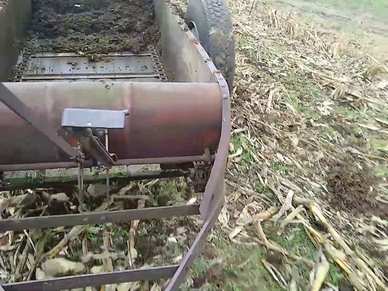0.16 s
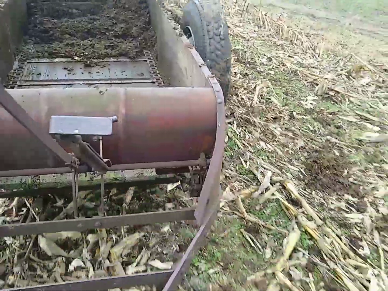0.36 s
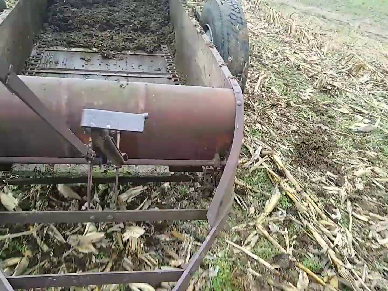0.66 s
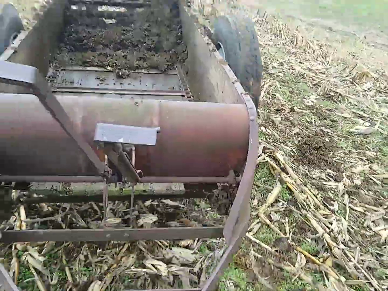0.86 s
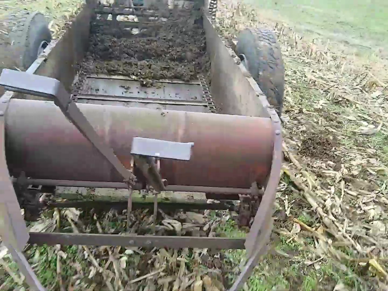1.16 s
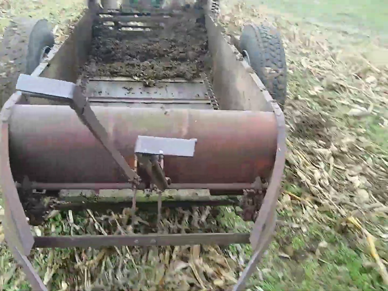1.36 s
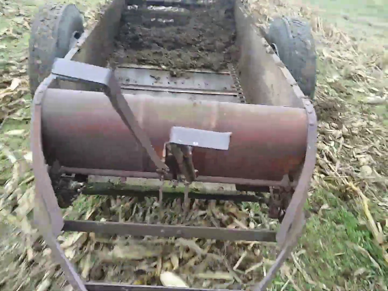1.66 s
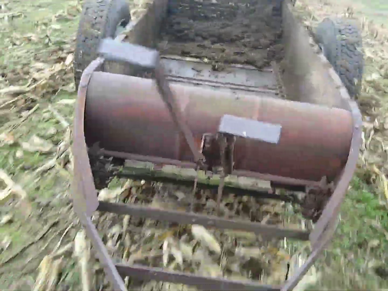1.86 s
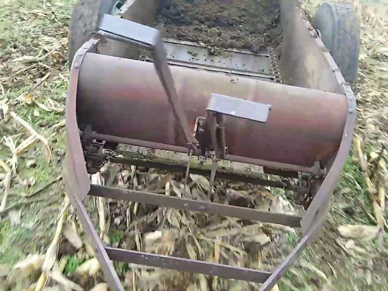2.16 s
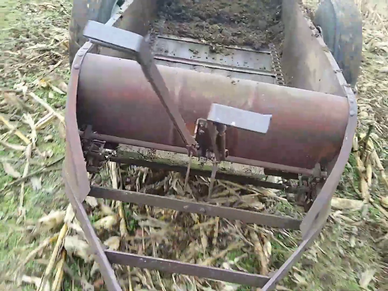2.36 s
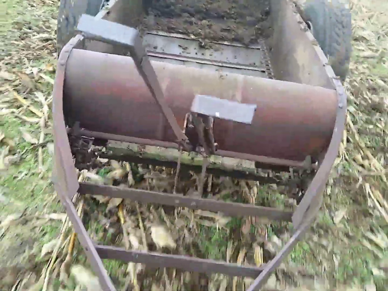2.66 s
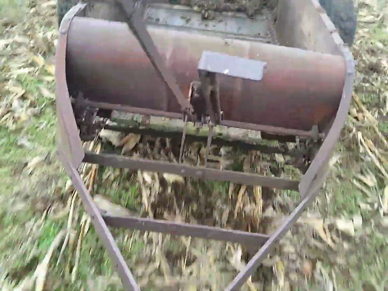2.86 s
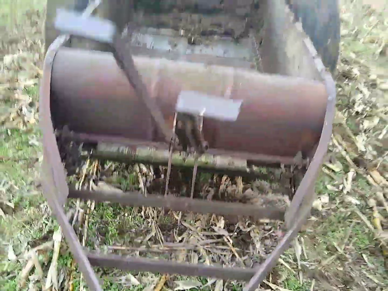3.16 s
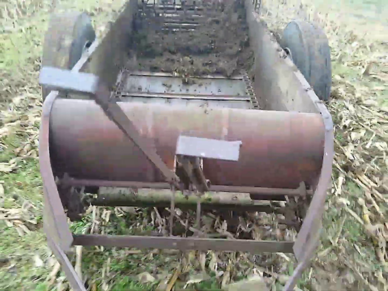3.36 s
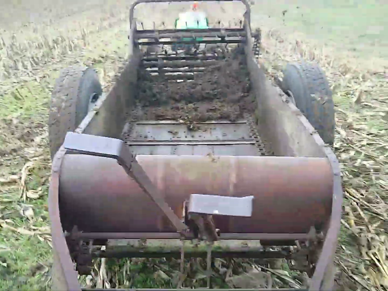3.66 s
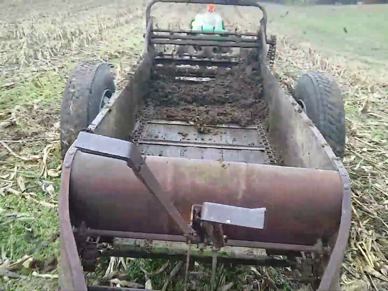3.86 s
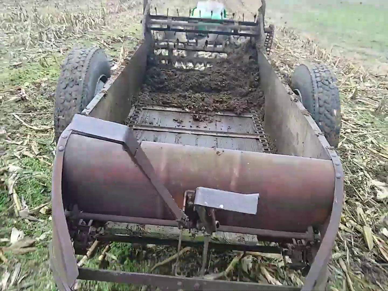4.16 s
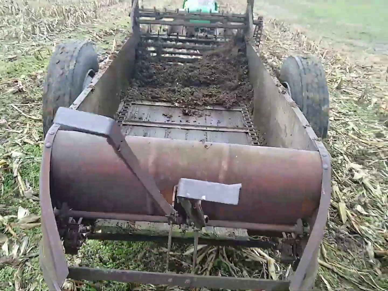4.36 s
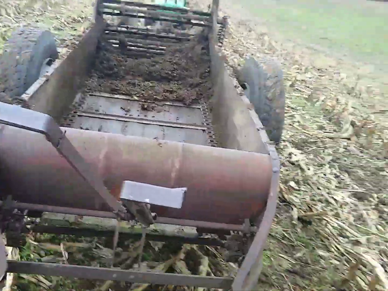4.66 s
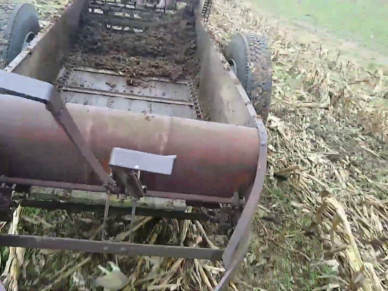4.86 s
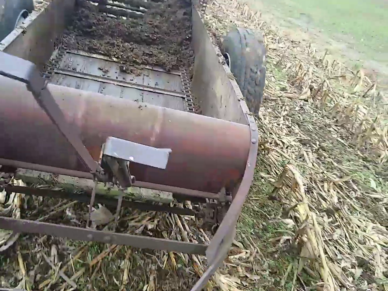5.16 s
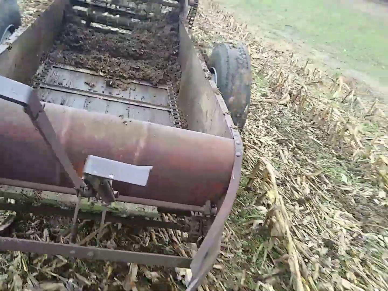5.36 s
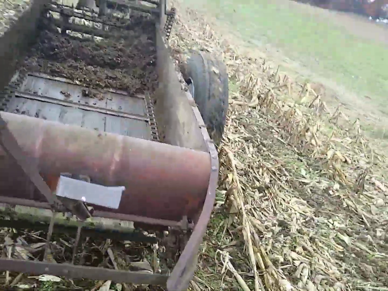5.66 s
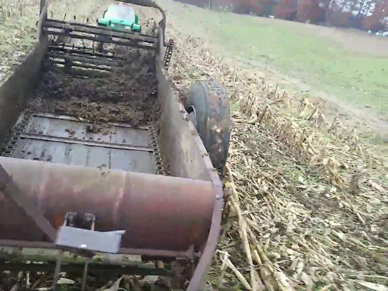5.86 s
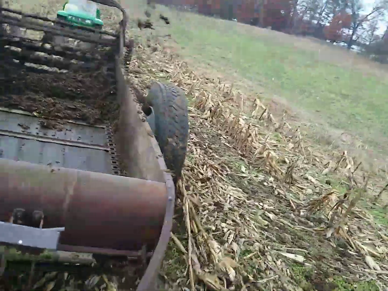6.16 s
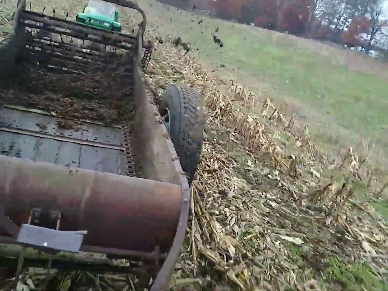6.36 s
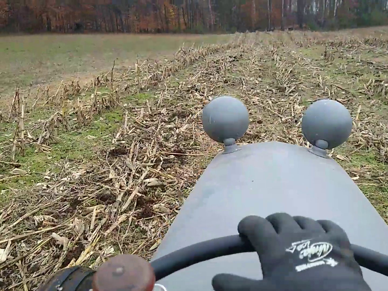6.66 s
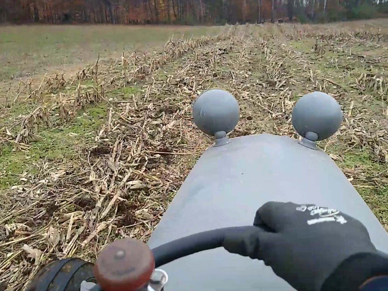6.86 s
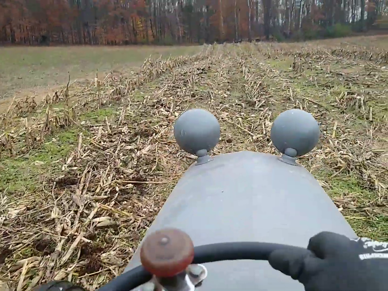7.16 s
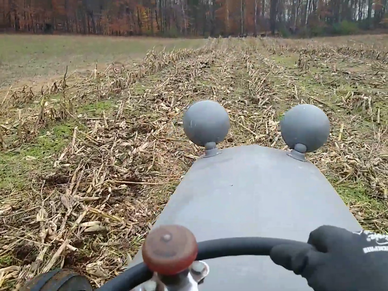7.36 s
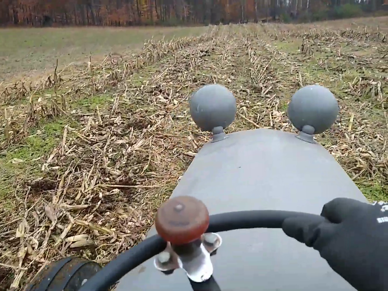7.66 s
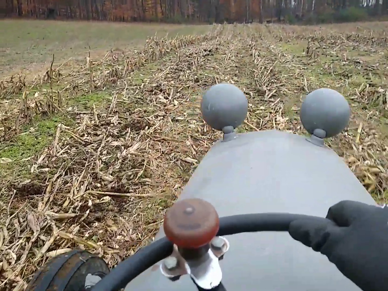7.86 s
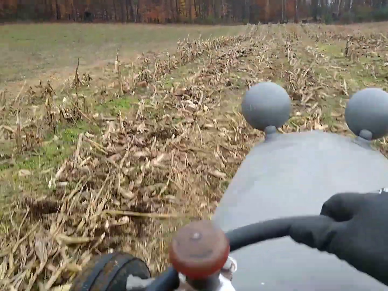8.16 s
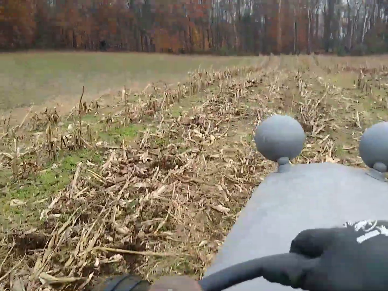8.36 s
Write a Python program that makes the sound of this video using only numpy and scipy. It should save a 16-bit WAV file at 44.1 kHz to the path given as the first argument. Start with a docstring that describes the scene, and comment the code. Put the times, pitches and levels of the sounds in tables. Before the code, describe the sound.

A small four-cylinder tractor works across an open stubble field at steady governed speed, heard in wide stereo from close by. From 0 to about 6.4 seconds the microphone faces the towed spreader: a medium-level engine drone with quick knocks, drive-line whine, and rough bright rattle, strongest in the first second. Narrow metallic ringing bands come and go as it swings. From about 1.8 seconds small bright chain ticks stand out, clustered around 2.1 to 3 seconds and scattered until 6.1. Soft low wind puffs bump near 1.4, 2.5, 3.2 and 4.9 seconds. The level drops suddenly and recovers several times, notably around 1.5, 3.6 and 5.3 seconds. At 6.44 everything cuts to silence for about a fifth of a second. From 6.64 to the end the engine is far louder and bassier, a throaty throbbing roar with dense knocking and less spreader clatter.

```python
"""A small four-cylinder tractor pulls a rattling spreader over stubble at a steady, governed speed.
First the microphone looks back at the spreader; after a short silence it faces the louder engine.
Sines make the engine and drive-line tones, shaped noise the roar, rattle and wind, ringing clicks the knocks
and ticks. Two close capsules feed a widener that subtracts a delayed copy of the opposite side."""
import sys
import numpy as np
from scipy import signal
from scipy.fft import rfft, irfft
from scipy.io import wavfile

SR = 44100
rng = np.random.default_rng(int(sys.argv[2]) if len(sys.argv) > 2 else 0)


def waveform_to_disk(signal):
    """Save audio, clipped to [-1, 1], as 16-bit WAV at the path in sys.argv[1]."""
    frames = np.transpose(np.atleast_2d(signal))
    scaled = np.clip(frames, -1, 1) * 32767
    samples = np.round(scaled).astype(np.int16)
    wavfile.write(sys.argv[1], SR, samples)


def level_to_linear(level):
    """Convert decibel levels to linear amplitude factors, elementwise."""
    exponent = np.asarray(level, float) / 20
    return 10 ** exponent


N = 374850
FREQ = np.maximum(np.fft.rfftfreq(N, 1 / SR), 1)
TIME = np.arange(N) / SR

# view to the rear: start [s], stop [s], crank speed [turns per s]
REAR_SPAN = (0, 6.439, 29.79)
# the microphone swings: (time [s], drive-line level [dB], lean to the left capsule [-1 to 1])
MICROPHONE_SWING = [(0, -2, -0.053), (1, -3.5, -0.028), (2.1, -4.5, 0.042), (3, -13, 0.021),
                    (4, -14, -0.0066), (5.5, -10.5, 0.011), (6.5, -5.5, 0.012), (6.6, -7, -0.058),
                    (8.5, -8, -0.08)]


def at_hz(points):
    """Reads the columns of a spectrum table at every frequency, along a logarithmic scale."""
    hz, *columns = np.transpose(points)
    return [np.interp(np.log(FREQ), np.log(hz), column) for column in columns]


def in_time(rows):
    """Reads the columns of a time table at every sample."""
    s, *columns = np.transpose(rows)
    return [np.interp(TIME, s, column) for column in columns]


def drift(per_s):
    """Slow random wandering with a spread of about 1: straight lines between chance values."""
    knots = rng.standard_normal(int(N / SR * 40) + 2)
    wander = np.interp(TIME * np.clip(per_s, .1, 39), np.arange(len(knots)), knots)
    return wander * np.sqrt(3 / 2)      # makes up for the spread lost between the knots


def rms_one(x):
    """Scales a signal to an average power of 1."""
    return x / np.sqrt(np.mean(x ** 2))


def fade(span):
    """A view fades in quickly before its start and is cut off after its stop."""
    start, stop, _ = span
    fade_in_db = np.minimum(0, 1100 * (TIME - start))       # 1100 dB per s
    fade_out_db = np.minimum(0, 20000 * (stop - TIME))      # 20000 dB per s
    return level_to_linear(fade_in_db + fade_out_db)


def ring(clicks, modes):
    """Clicks set a body's modes ringing, each mode struck with a strength of its own."""
    out = 0
    struck = np.flatnonzero(clicks)
    for hz, db, t60 in modes:
        radius = level_to_linear(-60 / (t60 * SR))      # falls by 60 dB in t60 seconds
        angle = 2 * np.pi * hz / SR
        blows = clicks + 1e-18
        blows[struck] *= level_to_linear(db + 1.6 * rng.standard_normal(len(struck)))
        feedback = [1, -2 * radius * np.cos(angle), radius ** 2]
        out = out + signal.lfilter([0, np.sin(angle)], feedback, blows)
    return out


def turning_tones(orders, turns):
    """Turning parts hum as sines at multiples of crank speed; higher ones waver more."""
    out = np.zeros((2, N))
    for order, common_db, difference_db in orders:
        waver = np.sqrt(order)
        phase = 2 * np.pi * (order * turns + rng.random()) + 0.057 * waver * drift(6.0)
        level_db = np.array([[common_db], [difference_db]]) + 0.3 * waver * drift(9.0)
        out += np.sqrt(2) * level_to_linear(level_db) * np.sin(phase)
    return out


def firing_throb(turns, cycle_db, turn_db, firing_db, edge_db):
    """Noise swells once per four-stroke cycle, once per turn, with each firing and at twice the firings."""
    angle = 2 * np.pi * turns + 0.3 * drift(8.7)
    slow_db = cycle_db * np.sin(angle / 2) + turn_db * np.sin(angle)
    fast_db = firing_db * np.sin(2 * angle) + edge_db * np.sin(4 * angle)      # two firings a turn
    return rms_one(level_to_linear(slow_db + fast_db))


def ticking_hiss(per_s, spread_db, tick_share):
    """Two unrelated hisses with small sharp ticks of chain links and tappets; tick_share is of the power."""
    sizes = level_to_linear(spread_db * np.minimum(rng.exponential(1, (2, N)), 4)) * rng.choice([-1, 1], (2, N))
    ticks = rms_one(sizes * (rng.random((2, N)) < per_s / SR))
    hiss = rng.standard_normal((2, N))
    return np.sqrt(1 - tick_share) * hiss + np.sqrt(tick_share) * ticks


def engine_roar(engine_db, turns):
    """The engine roars as ticking noise that throbs gently with its firings."""
    throb = firing_throb(turns, 0.34, 0.42, 0.15, 0.28)
    return ticking_hiss(600, 2.35, 0.17) * throb * level_to_linear(engine_db + 0.95 * drift(30.0))


def machine_rattle(treble_db, turns):
    """The machine rattles as denser ticking noise with a stronger throb."""
    throb = firing_throb(turns, 0.78, 1.0, 0.72, 0.47)
    rattle_db = 0.17 + 0.99 * treble_db + 1.36 * drift(32.0)
    return ticking_hiss(1500, 2.7, 0.25) * throb * level_to_linear(rattle_db)


def exhaust_puffing(treble_db, turns):
    """Exhaust gas hisses out in a sharp puff at each firing; the louder it is, the more distinct the puffs."""
    since_firing = (2 * turns + .04 * drift(20.0)) % 1      # 0 to 1 between firings
    decay_db = np.clip(6 + 1.3 * treble_db, 2, 15)
    puff_db = treble_db + decay_db * (.4 - since_firing) + 1.5 * drift(22.0)
    lope_db = 0.8 * np.sin(np.pi * turns + 0.5 * drift(3.7))      # once a four-stroke cycle
    flutter_db = 3.0 * drift(36)
    return rng.standard_normal((2, N)) * level_to_linear(puff_db + lope_db + flutter_db)


def machine_noise(noise, band_changes, engine_db, treble_db, turns):
    """Roar below, rattle above and puffing on top reach the capsules as common and difference signals."""
    high = 1 / (1 + (5100 / FREQ) ** 3)      # power share of the treble, from about 5100 Hz
    top = 1 / (1 + (11500 / FREQ) ** 8)      # share of the treble that puffs, from about 11500 Hz
    roar = rfft(engine_roar(engine_db, turns))
    rattle = rfft(machine_rattle(treble_db, turns))
    puffing = rfft(exhaust_puffing(treble_db, turns))
    treble = rattle * np.sqrt(1 - top) + puffing * np.sqrt(top)
    first, second = roar * np.sqrt(1 - high) + treble * np.sqrt(high)

    common_db, difference_db, follows = at_hz(noise)
    common = level_to_linear(common_db) * first
    difference = level_to_linear(difference_db) * (follows * first + np.sqrt(1 - follows ** 2) * second)
    # narrow bands are raised or lowered
    change_db = sum(db / (1 + (2 * (FREQ - hz) / width) ** 2) for hz, width, db in band_changes)
    low_cut = 1 / (1 + (35 / FREQ) ** 2)
    per_hz = np.sqrt(SR / 2) * level_to_linear(change_db) * low_cut      # white noise of power 1 spreads over SR / 2 Hz
    return irfft(per_hz * np.array([common, difference]), N)


def tractor(span, noise, band_changes, orders):
    """One view of the machine: noise and exhaust tones waver, and the tones lope, as its cylinders differ."""
    # slow level of the engine roar: (time [s], level [dB])
    roar_level = [(0, -2), (0.9, -0.5), (1.4, -3), (1.85, -0.5), (2.9, -2.4), (3.8, 0), (4.7, -2),
                  (5.2, 0.5), (6.0, -0.5), (6.4, 0), (6.64, -1.06), (8.5, -0.5)]
    # slow level of the treble: (time [s], level [dB])
    treble_level = [(0, 7.5), (0.15, 8.5), (0.3, 3.5), (0.68, 6.5), (1.0, 4.5), (1.27, 3.5), (1.45, 4),
                    (1.83, 4.5), (1.97, -0.5), (2.2, 5), (2.5, 1), (2.7, 6.5), (2.97, -0.5), (3.17, 3),
                    (3.44, -1), (3.6, 5), (4.1, 1.5), (4.4, 2), (5.5, 3.5), (5.9, 3), (6.3, 6), (6.44, 4.5),
                    (6.64, -5), (7.03, -6), (7.2, 0), (7.5, -5.5), (8.5, -2.5)]
    turns = span[2] * TIME
    engine_db = in_time(roar_level)[0] + 0.56 * drift(11.0)
    treble_db = in_time(treble_level)[0] + 1.0 * drift(11.0)
    lope_db = 0.5 * np.sin(np.pi * turns + 0.82 * drift(5.0))      # once a four-stroke cycle
    tones = turning_tones(orders, turns) * level_to_linear(0.5 * engine_db + lope_db)
    return (machine_noise(noise, band_changes, engine_db, treble_db, turns) + tones) * fade(span)


def knocks(span, knock, modes):
    """Each firing knocks on the casing; the cylinders differ, so the pattern repeats every second turn."""
    # strength of the four cylinders in firing order: (level [dB])
    cylinder_levels = [0, -11, -3.5, -13]
    # slow level of the knock: (time [s], level [dB])
    knock_level = [(0, -6), (1.2, -2.5), (3.2, -1), (4.6, 0), (6.4, -6), (6.6, -3)]
    first_s, knock_db, spread_db, jitter_s = knock
    firings_per_s = 2 * span[2]
    firing = np.arange(int((N / SR - first_s) * firings_per_s) - 1)
    chance = np.clip(rng.standard_normal((len(firing), 2)), -2, 2)
    at_s = first_s + firing / firings_per_s + jitter_s * chance[:, 0]
    blow_db = knock_db + np.array(cylinder_levels)[firing % 4] + spread_db * chance[:, 1]
    clicks = np.zeros(N)
    clicks[(at_s * SR).astype(int)] = level_to_linear(blow_db)
    pickup_db = in_time(knock_level)[0] + np.array([[0], [-12.0]])      # common, difference
    return ring(clicks, modes) * level_to_linear(pickup_db) * fade(span)


def unequal_cylinder_tone():
    """Unequal cylinders add a steady tone at a half multiple of crank speed in the rear view."""
    # (multiple of crank speed, common level [dB], difference level [dB])
    steady_tone = [(15.5, -40, -50)]
    return turning_tones(steady_tone, REAR_SPAN[2] * TIME) * fade(REAR_SPAN)


def rear_view():
    """The machine heard towards the rear: noise, engine tones and knocks from the casing behind the seat."""
    # noise at the capsules: (frequency [Hz], common level [dB per Hz], difference level [dB per Hz],
    # share of the difference that follows the common part [0-1])
    rear_noise = [(40, -73, -75, 0.18), (60, -76, -67, 0.42), (100, -50.5, -79, 0.7),
                  (170, -51.5, -66, 0.39), (281, -51.5, -57, 0.2), (465, -55, -64.5, 1),
                  (692, -61, -61.5, 0), (1100, -67, -67, 0.21), (1890, -72, -68, 0.25),
                  (2690, -70, -73, 0.22), (3120, -75.5, -74.5, 0.14), (5350, -85.5, -84.5, 0.07),
                  (8580, -91.5, -91.5, 0.4), (11460, -86, -86, 0.3), (13400, -81.5, -81, 0.12),
                  (15400, -84, -89, 0.15)]
    # narrow bands of the noise raised or lowered: (frequency [Hz], width [Hz], change [dB])
    rear_band_changes = [(2900, 290, -1), (4900, 220, 2), (12600, 400, -4.5), (13700, 250, -1)]
    # exhaust tones: (multiple of crank speed, common level [dB], difference level [dB])
    rear_orders = [(2, -39.5, -54), (4, -26, -37.5), (6, -35.5, -44.5), (8, -36.5, -60), (9, -39, -59),
                   (10, -43, -49), (12.5, -47, -56), (14.5, -43, -52), (15, -44.5, -40), (20.5, -49, -58)]
    # combustion knock: (first knock [s], level [dB], level spread [dB], timing spread [s])
    rear_knock = (0.0475, -21, 2.0, .00015)
    # what the casing behind the seat rings with: (frequency [Hz], level [dB], time to fall 60 dB [s])
    rear_block = [(262, -2, .04), (445, 0, .06), (600, -7, .035), (790, -11, .025)]
    machine = tractor(REAR_SPAN, rear_noise, rear_band_changes, rear_orders)
    return machine + unequal_cylinder_tone() + knocks(REAR_SPAN, rear_knock, rear_block)


def front_view():
    """The machine heard towards the louder engine: noise, exhaust tones and knocks from the engine block."""
    front_span = (6.637, 8.5, 28.12)      # start [s], stop [s], crank speed [turns per s]
    # noise at the capsules: (frequency [Hz], common level [dB per Hz], difference level [dB per Hz],
    # share of the difference that follows the common part [0-1])
    front_noise = [(40, -64, -68.5, 0.13), (60, -48, -63, 0.9), (101, -48, -47, 0.82),
                   (183, -39.5, -55, 0.62), (258, -38.5, -51.5, 0.29), (468, -46.5, -51.5, 0.5),
                   (720, -49, -56, 0.38), (960, -51, -57, 0.45), (1840, -63.5, -61.5, 0.56),
                   (2780, -62, -64.5, 0.64), (3460, -68, -67, 0.27), (5700, -75, -75.5, 0.14),
                   (8500, -82, -82, 0.15), (11000, -79.5, -79.5, 0.26), (13500, -77, -76, 0.18),
                   (15400, -79, -85, 0.13)]
    # narrow bands of the noise raised: (frequency [Hz], width [Hz], change [dB])
    front_band_changes = [(1040, 31, 3.8), (1470, 52, 5.5), (2850, 140, 2.5)]
    # exhaust tones: (multiple of crank speed, common level [dB], difference level [dB])
    front_orders = [(2, -36.5, -47), (3.5, -33, -50.5), (4, -15, -28), (6, -20.5, -31), (6.5, -26.5, -37),
                    (7.5, -31, -40), (8, -29, -33), (10.5, -35, -42), (12, -38, -42), (14, -37, -31.5),
                    (15.5, -35, -43), (16.5, -34, -43), (17.5, -38, -46), (28, -41, -50), (52.3, -50, -52)]
    # combustion knock: (first knock [s], level [dB], level spread [dB], timing spread [s])
    front_knock = (6.637, -14, 3.5, .0003)
    # what the engine block rings with: (frequency [Hz], level [dB], time to fall 60 dB [s])
    front_block = [(270, 0, .04), (480, -1, .04), (800, -8, .02), (1035, -6, .04)]
    machine = tractor(front_span, front_noise, front_band_changes, front_orders)
    return machine + knocks(front_span, front_knock, front_block)


def drive_line():
    """Drive-line tones sound behind the seat and fade as the microphone swings away."""
    # (multiple of crank speed, common level [dB], difference level [dB])
    drive_orders = [(19, -36.5, -50), (22.04, -43, -56), (26.03, -50, -58), (28, -52, -60), (32, -51, -60)]
    shade_db = in_time(MICROPHONE_SWING)[0]
    return level_to_linear(shade_db) * turning_tones(drive_orders, REAR_SPAN[2] * TIME) * fade(REAR_SPAN)


def ringing_panels():
    """Clatter passes through narrow resonances of the spreader, each swelling in and out."""
    # rattle bands that come and go as the microphone swings:
    # (start [s], stop [s], frequency [Hz], width [Hz], level [dB])
    ringing_bands = [(-.3, 1.5, 2645, 18, -51), (-.3, 1.5, 2780, 20, -55), (-.3, .35, 2930, 20, -52),
                     (.4, .95, 2865, 20, -52), (.85, 2, 2930, 20, -50), (2, 2.9, 2875, 30, -52),
                     (2.9, 4.5, 2945, 25, -50), (3.9, 4.8, 3185, 25, -54), (4.7, 5.2, 3690, 25, -57),
                     (6, 6.7, 2950, 25, -53), (6, 6.7, 3185, 25, -55), (.55, 1.95, 13600, 150, -49),
                     (1, 1.85, 14000, 120, -51), (.55, 1.95, 14600, 250, -49), (2.5, 3, 13750, 150, -50),
                     (3, 3.4, 14500, 250, -53), (3.85, 4.3, 13300, 150, -56), (5.85, 6.7, 12200, 200, -53),
                     (5.85, 6.7, 14000, 400, -53)]
    fade_s = 0.099
    out = np.zeros((2, N))
    clatter = ticking_hiss(320, 3.2, 0.29) * level_to_linear(1.4 * drift(30.0))
    for start, stop, hz, width, db in ringing_bands:
        part = slice(max(0, int(start * SR)), int(stop * SR))
        radius = np.exp(-np.pi * width / SR)
        feedback = [1, -2 * radius * np.cos(2 * np.pi * hz / SR), radius ** 2]
        band = signal.lfilter([1, 0, -1], feedback, clatter[:, part])
        nearest_end_s = np.minimum(TIME[part] - start, stop - TIME[part])
        swell = np.clip(nearest_end_s / fade_s, 0, 1)
        out[:, part] += level_to_linear(db) * swell * rms_one(band)
    return out * level_to_linear(np.array([[0], [-3.0]])) * fade(REAR_SPAN)


def chain_ticks():
    """A link of the apron chain drops on steel: a short bright ring; fainter ones fall at random."""
    # clear ticks: (time [s], level [dB])
    clear_ticks = [(1.8144, -32), (1.9909, -32), (2.1087, -33), (2.1415, -30), (2.2443, -26), (2.2863, -32),
                   (2.3436, -22), (2.5451, -27.5), (2.5767, -35), (2.7442, -28), (2.812, -25), (3.014, -27),
                   (3.8871, -27), (4.0054, -28), (4.0552, -28), (4.1555, -30), (4.1885, -29), (4.4403, -26),
                   (4.7466, -27), (5.0814, -33), (5.4212, -35), (5.7548, -29), (6.0082, -30), (6.1434, -33)]
    # what a link rings with: (frequency [Hz], level [dB], time to fall 60 dB [s])
    link_modes = [(3300, -8, .012), (5100, -6, .022), (5400, -9, .015), (7600, -19, .008)]
    faint = rng.random(N) < 40 / SR      # about 40 per s
    faint = faint * (TIME > 1.4) * (TIME < REAR_SPAN[1])
    clicks = faint * level_to_linear(-41 + 2.2 * rng.standard_normal(N))
    for s, db in clear_ticks:
        clicks[round(s * SR)] = level_to_linear(db)
    return ring(clicks, link_modes) * level_to_linear(np.array([[1.0], [-5.0]]))      # left, right


def wind():
    """Wind puffs on the two microphone ports as short bursts of low noise, unrelated left and right."""
    # puffs: (time of the middle [s], level [dB])
    wind_puffs = [(1.39, -29), (2.24, -32), (2.49, -25), (3.23, -27), (4.891, -26)]
    puff_s, low_hz, high_hz = 0.02, 50, 220
    swell = sum(level_to_linear(db) * np.exp(-.5 * ((TIME - s) / puff_s) ** 2) for s, db in wind_puffs)
    band = signal.butter(2, [low_hz, high_hz], "band", fs=SR, output="sos")
    return swell * rms_one(signal.sosfilt(band, rng.standard_normal((2, N))))


def level_dips():
    """The level drops at once and creeps back, several times."""
    # dips: (time [s], depth before recovery [dB], recovery [s])
    dip_table = [(1.477, 7.5, 0.066), (1.929, 5, 0.092), (3.506, 4.5, 0.1), (3.632, 10.5, 0.038),
                 (4.34, 3.5, 0.094), (4.75, 2.5, 0.068), (4.94, 3, 0.071), (5.309, 7, 0.07), (5.8, 2, 0.28),
                 (6.638, 5.5, 0.072)]
    onset_s = 0.0053
    gain = 1
    for s, depth_db, recovery_s in dip_table:
        drop_in = np.clip((TIME - s) / onset_s, 0, 1)
        gain = gain * level_to_linear(-depth_db * drop_in * np.exp(-np.abs(TIME - s) / recovery_s))
    return gain


def scene():
    """The left and right capsules pick up the sum and the difference of the machine's two signals."""
    machine = rear_view() + front_view() + drive_line() + ringing_panels()
    common, difference = machine * level_dips()
    lean = in_time(MICROPHONE_SWING)[1]
    difference = difference + lean * common      # turning the microphone favours one capsule
    return np.array([common + difference, common - difference]) + chain_ticks() + wind()


def band_limit(x):
    """A steep low-pass at the top of the band."""
    return signal.sosfilt(signal.butter(12, 16660, fs=SR, output="sos"), x)


def record(dry):
    """Each side loses a delayed, dulled copy of the other, which combs the centre; top cut, peaks rounded."""
    widener_gain, lag_s, dulling_hz = 0.7, 0.0004448, 6500
    cutoff_hz, cutoff_width_hz = 15550, 40
    ceiling = 0.89      # of full scale
    delay = np.exp(-2j * np.pi * FREQ * lag_s)
    cross = widener_gain / (1 + (FREQ / dulling_hz) ** 2) * delay
    top_cut = (1 - np.tanh((FREQ - cutoff_hz) / cutoff_width_hz)) / 2
    sides = rfft(dry)
    wide = irfft((sides - cross * sides[::-1]) * top_cut, N)
    rounded = wide / (1 + np.abs(wide / ceiling) ** 4) ** (1 / 4)
    return band_limit(rounded)


dry = scene()
out = record(dry)
waveform_to_disk(out)
```